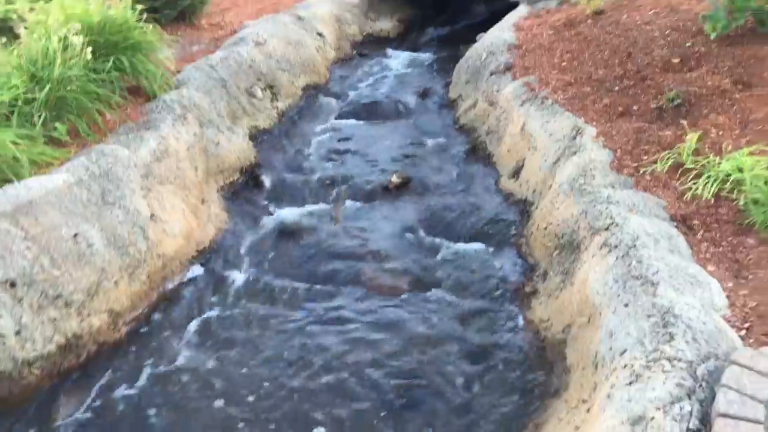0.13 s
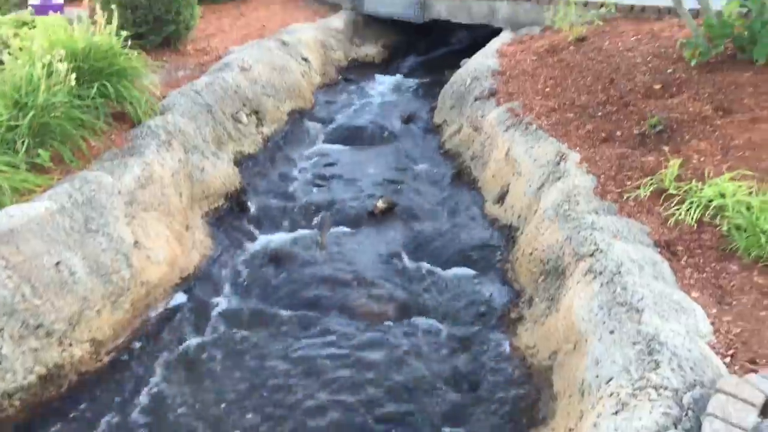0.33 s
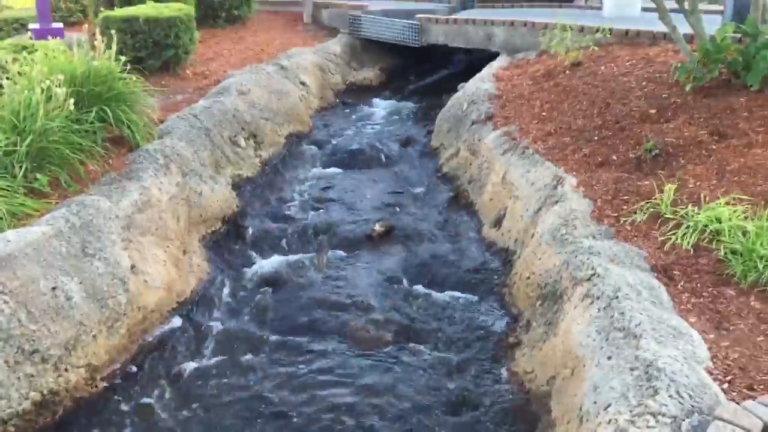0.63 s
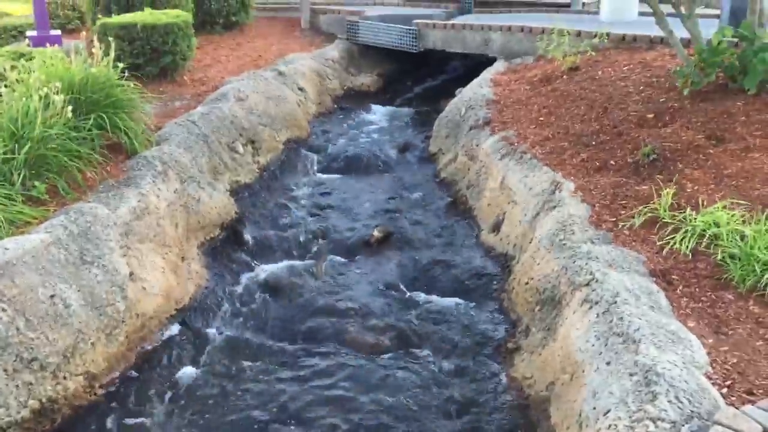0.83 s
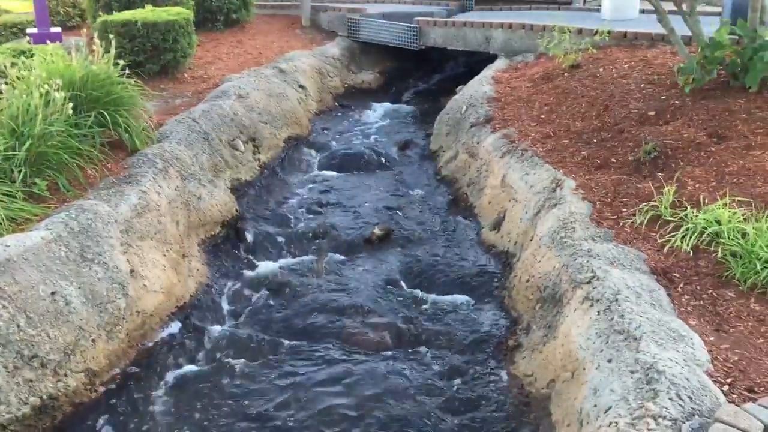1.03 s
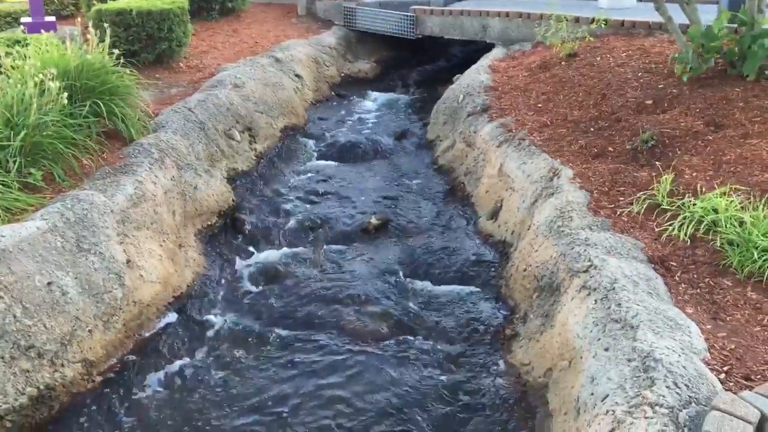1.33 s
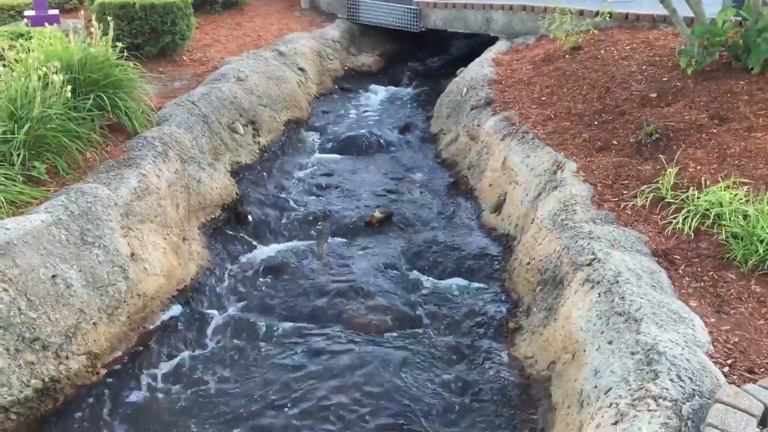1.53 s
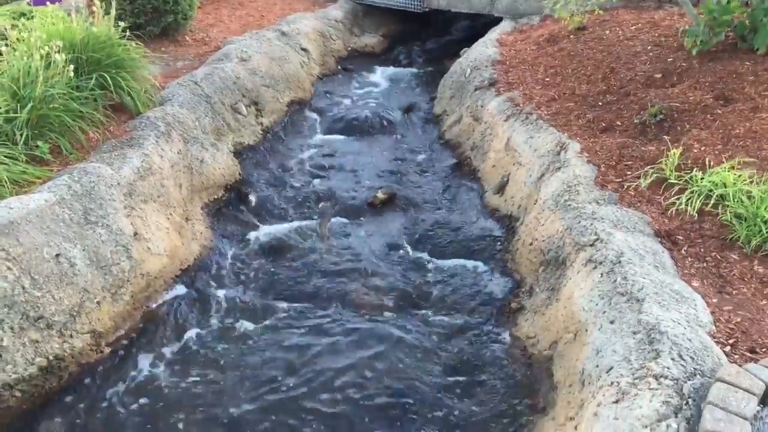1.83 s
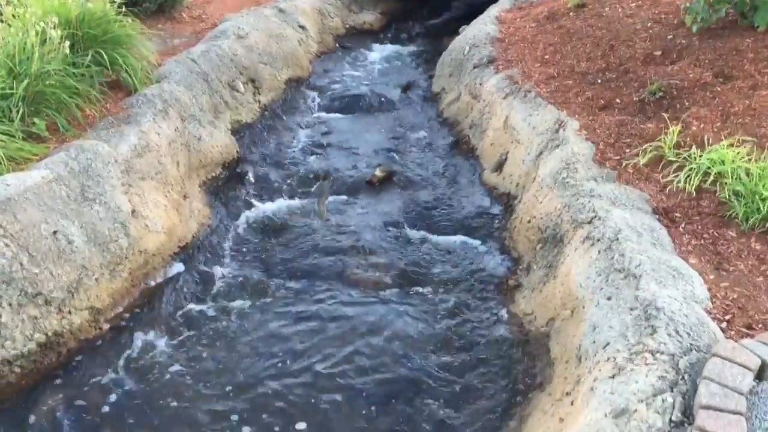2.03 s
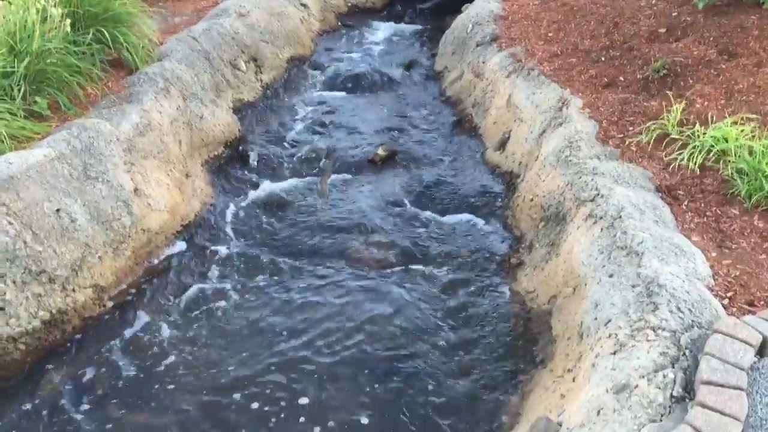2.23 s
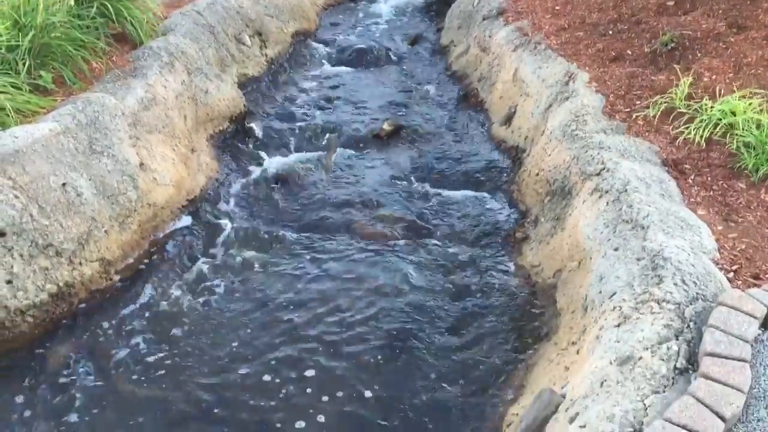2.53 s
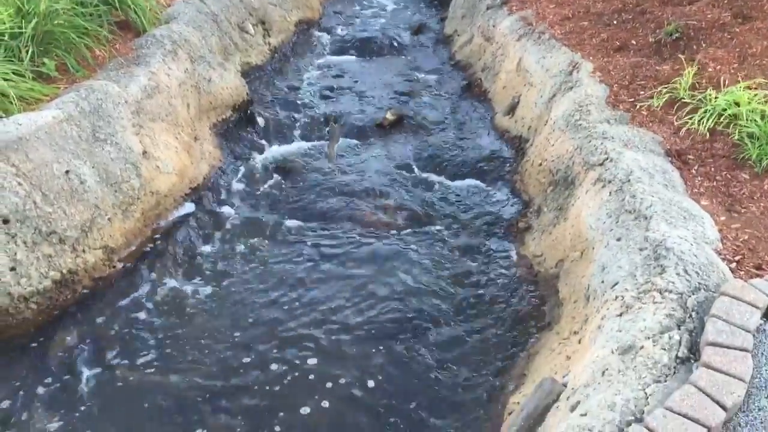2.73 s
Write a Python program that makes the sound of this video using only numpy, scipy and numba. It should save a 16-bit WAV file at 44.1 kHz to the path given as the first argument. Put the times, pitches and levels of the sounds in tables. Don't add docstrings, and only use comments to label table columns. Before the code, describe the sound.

A shallow stream rushes steadily over low steps, with small gurgles and a few dull handling thumps.

```python
import sys
import numpy as np
from scipy import signal
from scipy.fft import rfft, irfft
from scipy.io import wavfile
from scipy.ndimage import uniform_filter1d
from numba import njit

SR = 44100
rng = np.random.default_rng(int(sys.argv[2]) if len(sys.argv) > 2 else 0)


def voltage_ratio(decibels):
    exponent = np.asarray(decibels, float) / 20
    return 10 ** exponent


def waveform_to_disk(signal):
    frames = np.transpose(np.atleast_2d(signal))
    scaled = np.clip(frames, -1, 1) * 32767
    samples = np.round(scaled).astype(np.int16)
    wavfile.write(sys.argv[1], SR, samples)


N = 127008

# (frequency [Hz], spectral level [dB per Hz])
WATER_COLOUR = [(240, -13), (400, -7.5), (703, -1.5), (1460, -1.5), (3230, -6.5), (4880, -11), (6130, -9.5),
                (13300, -14), (15300, -16.5)]
# (frequency [Hz], width [Hz], depth [0-1])
PORT_NOTCHES = [(4960, 280, 0.21), (7480, 900, 0.22), (10430, 900, 0.4)]


def level(x, db):
    return x * voltage_ratio(db) / np.sqrt(np.mean(x ** 2))


def along(table, x, log=False):
    a = np.array(table, float)
    if log:
        return np.interp(np.log(x), np.log(a[:, 0]), a[:, 1])
    return np.interp(x, a[:, 0], a[:, 1])


def band(x, hz, width_hz):
    return signal.lfilter(*signal.iirpeak(hz, hz / width_hz, fs=SR), x)


def walk(rate):
    hold = int(SR / rate)
    steps = np.repeat(rng.standard_normal(N // hold + 1), hold)
    return 1.09 * uniform_filter1d(uniform_filter1d(steps, hold), hold)[:N]


def rush(table, low_hz, count, patch_db, flicker_db, rate):
    f = np.maximum(np.fft.rfftfreq(N, 1 / SR), 1)
    colour = voltage_ratio(along(table, f, log=True))
    out, shared = 0, walk(rate / 4)
    for k in range(count):
        shared = 0.9 * shared + 0.5 * walk(rate / 4)
        slot = np.cos(np.pi / 2 * np.clip(3 * np.log2(f / low_hz) - k, -1, 1))
        noise = irfft(rfft(rng.standard_normal(N)) * slot * colour, N)
        out = out + noise * voltage_ratio(patch_db * shared + flicker_db * walk(rate))
    return level(out, 0)


@njit
def ring(n, start, step, cycles, size, rise):
    out = np.zeros(n)
    for k in range(len(start)):
        span = cycles * 2 * np.pi / step[k]
        z = size[k] + 0j
        turn = np.exp(1j * step[k] - 3 / span)
        glide = np.exp(1j * step[k] * rise / span)
        for i in range(start[k], min(n, start[k] + int(2 * span))):
            z *= turn
            turn *= glide
            out[i] += z.imag
    return out


def bubbles(per_s, low_hz, high_hz, cycles, scatter_db, rise):
    count = int(round(per_s, -1) * 3)
    when, pitch, luck = rng.random((count, 3)).T
    hz = low_hz * (high_hz / low_hz) ** pitch
    size = hz * voltage_ratio(along(WATER_COLOUR, hz, log=True) - scatter_db * np.log(1 - luck))
    return ring(N, (when * N).astype(np.int64), 2 * np.pi * hz / SR, 1. * cycles, size, 1. * rise)


def gurgling():
    # (time [s], frequency [Hz], level [dB])
    pockets = [(.344, 1580, -36), (.614, 1680, -35), (.64, 1990, -35), (.79, 1900, -37), (1.073, 1960, -32),
               (1.09, 784, -36), (1.355, 600, -39), (1.555, 836, -40), (1.68, 1710, -32.5),
               (1.695, 696, -35.5), (1.94, 725, -32.5), (1.972, 1335, -38), (2.005, 563, -39),
               (2.055, 895, -37), (2.155, 689, -34), (2.318, 1470, -36), (2.405, 750, -37),
               (2.676, 1065, -36), (2.745, 1580, -42.5)]
    s, hz, db = np.array(pockets).T
    gurgle = ring(N, (s * SR).astype(np.int64), 2 * np.pi * hz / SR, 41., voltage_ratio(db), -0.0026)
    s, hz, db = np.array([(.902, 1790, -27)]).T
    drip = ring(N, (s * SR).astype(np.int64), 2 * np.pi * hz / SR, 110., voltage_ratio(db), -.07)
    return gurgle + drip


def water(t):
    # (time [s], level [dB])
    flow = [(0.1, -35.5), (0.16, -35.5), (0.89, -34), (1.51, -35.5), (2.23, -33.5), (2.43, -35),
            (2.87, -34.5), (2.88, -36)]
    # (time [s], level [dB])
    bubbling = [(.1, 5.5), (.26, -6), (.63, -3), (.8, -2.5), (1.1, -2), (1.5, 0), (1.88, 1), (1.96, 2),
                (2.16, 2.5), (2.6, -0.5), (2.7, -1.5), (2.88, 3)]
    spray = voltage_ratio(-1.5) * rush(WATER_COLOUR, 245.3, count=19, patch_db=.55, flicker_db=.9, rate=24.)
    fizz = bubbles(9000, 456.0, 11130.0, cycles=6, scatter_db=1.6, rise=.1)
    plops = bubbles(320, 557, 4450, cycles=24, scatter_db=1.9, rise=0.074)
    mix = spray + level(fizz, -8) + voltage_ratio(along(bubbling, t)) * level(plops, -11.5)
    swell_db = .3 * walk(16.0)
    return mix * voltage_ratio(along(flow, t) + swell_db) + gurgling()


def culvert(t):
    # (frequency [Hz], pitch wander [Hz], level [dB])
    modes = [
        (104.1, 2.56, -47),
        (162, 4.5, -50),
        (258.6, 5.65, -62),
    ]
    # (centre time [s], length [s], boost [dB])
    drives = [
        [(.13, 0.14, 8), (.27, 0.095, 9), (.65, 0.091, 8), (1.37, 0.12, 15), (1.6, .12, 10), (1.71, .1, 15),
         (2.43, .12, 17), (2.79, .17, 13.5)],
        [(.22, .16, 9), (.42, 0.36, 8), (.66, .14, 8), (.86, .16, 8), (1.3, 0.21, 5), (1.65, .08, 7),
         (1.82, 0.028, 10), (1.94, 0.05, 9), (2.12, 0.039, 9), (2.62, .2, 9)],
        [(.7, 0.88, 10), (1.48, 0.056, 15.5)],
    ]
    flicker_db = 3.2
    out = 0
    for (hz, wander_hz, db), swells in zip(modes, drives):
        phase = 2 * np.pi * np.cumsum(hz + wander_hz * walk(18.)) / SR
        tone = np.sin(phase) * voltage_ratio(flicker_db * walk(16.))
        swell = sum(boost_db * np.exp(-(2 * (t - s) / d) ** 2) for s, d, boost_db in swells)
        out = out + level(tone, db) * voltage_ratio(swell)
    return out


def wind(t):
    # (frequency [Hz], spectral level [dB per Hz])
    wind_colour = [(13, -43), (22, -25), (49, 5), (86, -1), (170, -7.5), (278, -12.5), (450, -24),
                   (580, -46), (990, -120)]
    # (time [s], level [dB])
    gusts = [(.1, -42), (.3, -39.5), (.6, -39), (.9, -38), (1.2, -35), (1.45, -37), (1.6, -39), (1.93, -38),
             (2.17, -38.5), (2.48, -37.5), (2.6, -41), (2.88, -39)]
    rumble = rush(wind_colour, 20.03, count=15, patch_db=1.36, flicker_db=2.5, rate=14.)
    return rumble * voltage_ratio(along(gusts, t) + 1)


def buffets(t):
    # (centre time [s], peak level [dB], frequency [Hz], length [cycles])
    eddies = [(0.087, -23, 94, 1.6), (.137, -19.5, 84, 1.4), (0.2733, -25.5, 78, 1.8),
              (0.302, -23.5, 64.4, 2.1), (0.411, -25.5, 56.4, 4.4), (0.494, -20, 79.6, 2.8),
              (0.519, -14, 80, 1.5), (0.869, -23.5, 54.7, 2.2), (0.955, -23, 60, 0.85),
              (1.017, -24.5, 65, 1.9), (1.088, -18, 82, 2.2), (1.351, -22, 74, 1.8), (1.462, -16, 86, 2),
              (1.483, -23, 91, 0.61), (1.74, -16, 83.5, 2.06), (2.131, -31.5, 73, 5.7),
              (2.296, -27, 68, 1.4), (2.489, -22.5, 57, 3.4), (2.718, -34, 60, 1.8)]
    out = np.zeros(N)
    for s, db, hz, cycles in eddies:
        turn = (t - s) * hz
        bell = np.exp(-(2.5 * turn / cycles) ** 2)
        fall = 1 - 0.24 * np.clip(turn / cycles, -1, 1)
        out -= voltage_ratio(db) * bell * np.sin(2 * np.pi * turn * fall)
    return out


def knocks(t):
    # (time [s], peak level [dB], frequency [Hz], ring time [s])
    taps = [
        (0.1041, -9.5, 167, 0.0013),
        (0.2934, -12.5, 180, 0.0025),
        (0.912, -42.5, 172, 0.032),
        (1.323, -29, 131.4, .006),
        (1.433, -30, 149, 0.0036),
        (1.474, -38.5, 240, 0.0056),
        (1.742, -22, 140, 0.0038),
        (1.86, -30, 130, 0.0033),
        (2.285, -24, 100, .004),
    ]
    rise_s, sag = .0007, .35
    soft = 3.2
    out = np.zeros(N)
    for s, db, hz, ring_s in taps:
        u = np.maximum(t - s, 0)
        turn = hz * (u + sag * ring_s * (1 - np.exp(-u / ring_s)))
        push = 1 - np.exp(-(u / rise_s) ** 2)
        hit = push * np.exp(-u / ring_s) * np.sin(2 * np.pi * turn)
        out += 2 * voltage_ratio(db) * signal.sosfiltfilt(signal.butter(5, soft * hz, fs=SR, output="sos"), hit)
    return out


def scene():
    t = np.arange(N) / SR
    mono = water(t) + culvert(t) + wind(t) + buffets(t) + knocks(t)
    return np.array([mono, mono])


def starve(x):
    f, t, z = signal.stft(x, SR, nperseg=2048)
    cells = rng.random((len(f) // 5 + 1, len(t) // 2 + 1))
    cells = cells.repeat(5, 0).repeat(2, 1)[:len(f), :len(t)]
    dip = np.exp(-((f - PORT_NOTCHES[2][0]) / 120) ** 2)
    treble = np.clip(f / 15000, 0, 1) ** 7
    fade = np.exp(-(t / 1.2) ** 2)
    share = .13 * (treble + 2 * dip)[:, None] * fade
    return signal.istft(z * (cells > share), SR, nperseg=2048)[1][:N]


def split_bands(x, t, f):
    # (centre time [s], low edge [Hz], high edge [Hz])
    splits = [(.163, 11000, 12400), (.186, 6900, 8300), (.21, 6300, 8300), (.21, 9000, 10300),
              (.349, 10300, 11700), (.558, 6900, 8300), (.813, 4700, 5700), (1.417, 4700, 5700),
              (1.417, 11700, 13100), (1.812, 11000, 12400), (1.812, 13800, 15200), (2.16, 6900, 8300),
              (2.81, 9000, 11000)]
    split_s, side_db, loss = 0.042, -3, .3
    spread = np.abs(rfft(x)) * np.exp(2j * np.pi * rng.random(len(f)))
    side = 0
    for s, low_hz, high_hz in splits:
        frame = np.cos(np.pi * np.clip((t - s) / split_s, -.5, .5))
        inside = (f > low_hz) * (f < high_hz)
        side = side + irfft(spread * inside, N) * frame
        x = x - loss * irfft(rfft(x) * inside, N) * frame
    return x + voltage_ratio(side_db) * side * np.array([[1], [-1]])


def roll_off(x):
    return signal.sosfilt(signal.butter(12, 16290, fs=SR, output="sos"), x)


def record(dry):
    start_s, top_hz, port_low_hz = .0838, 15330, 31
    t, f = np.arange(N) / SR, np.fft.rfftfreq(N, 1 / SR)
    x = signal.sosfilt(signal.butter(2, port_low_hz, "high", fs=SR, output="sos"), dry[0])
    for hz, width_hz, depth in PORT_NOTCHES:
        x = x - depth * band(x, hz, width_hz)
    both = split_bands(starve(x), t, f) * (t > start_s)
    top_cut = np.clip((top_hz - f) / 100 + .5, 0, 1) ** 2
    both = irfft(rfft(both) * top_cut, N) * np.clip((t - start_s) / 0.02 + 1, 0, 1)
    return roll_off(both)


dry = scene()
out = record(dry)
waveform_to_disk(out)
```